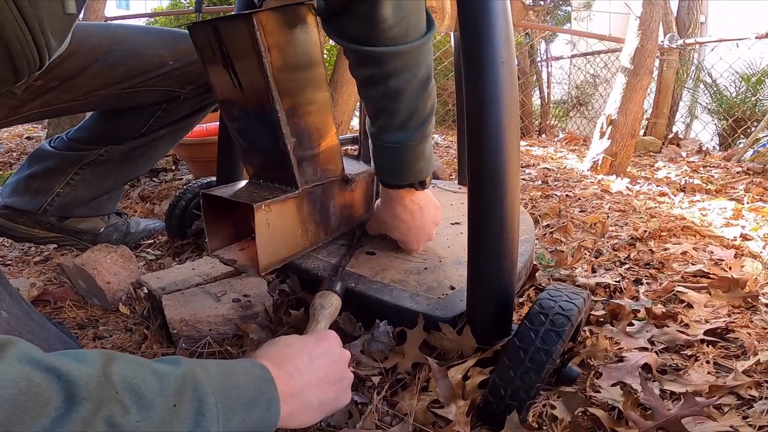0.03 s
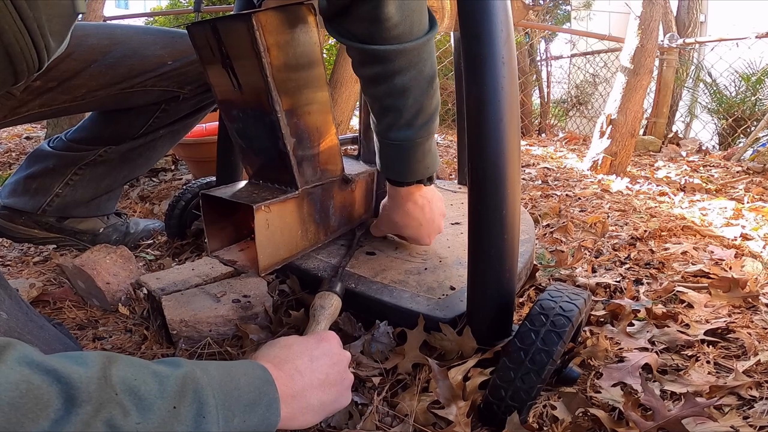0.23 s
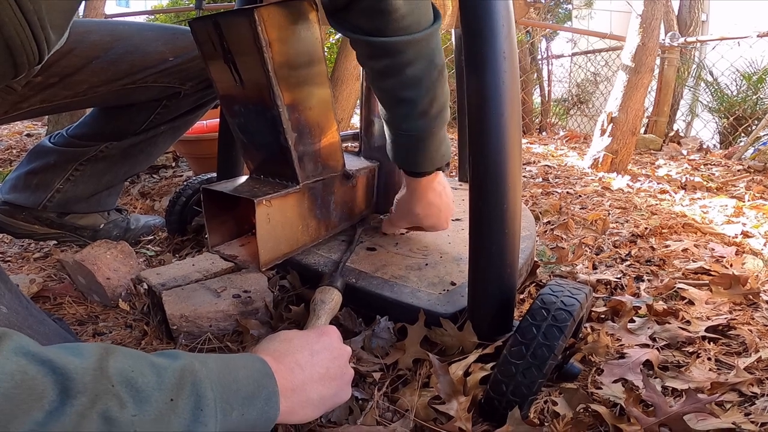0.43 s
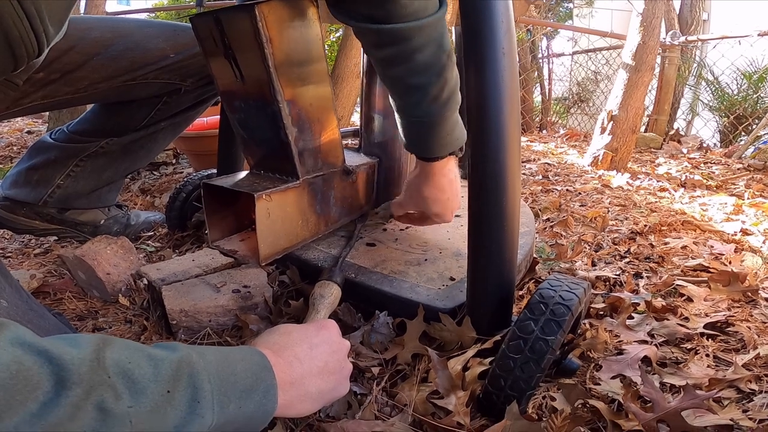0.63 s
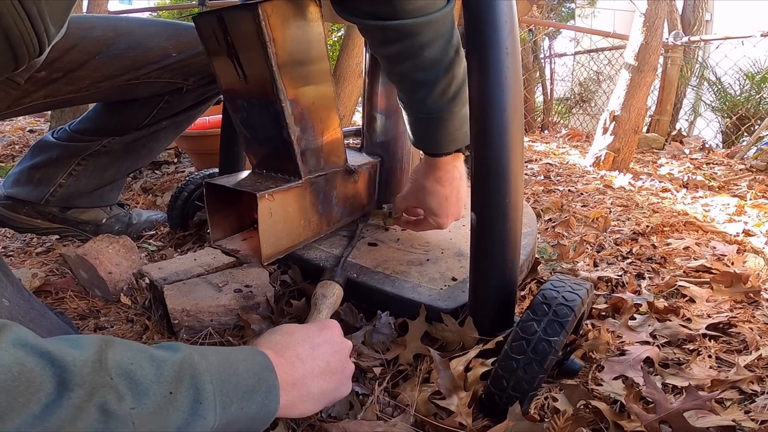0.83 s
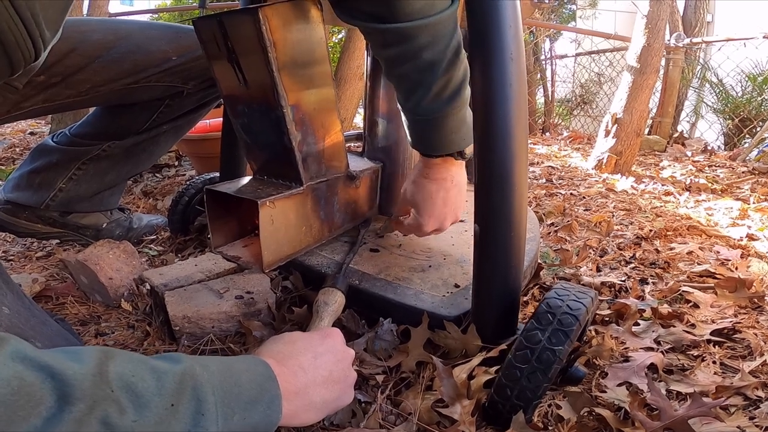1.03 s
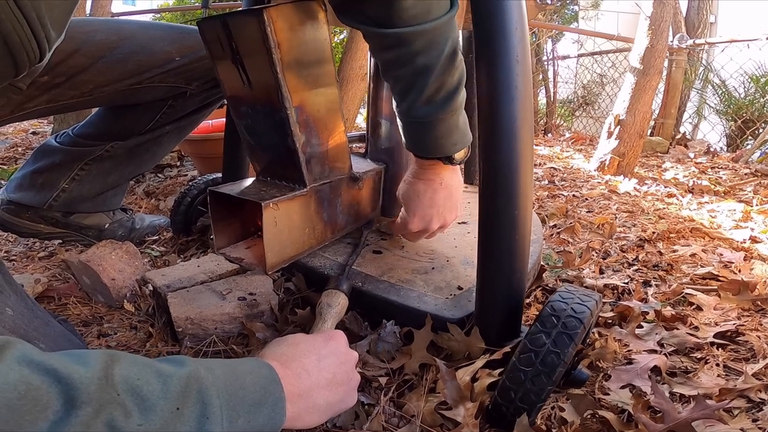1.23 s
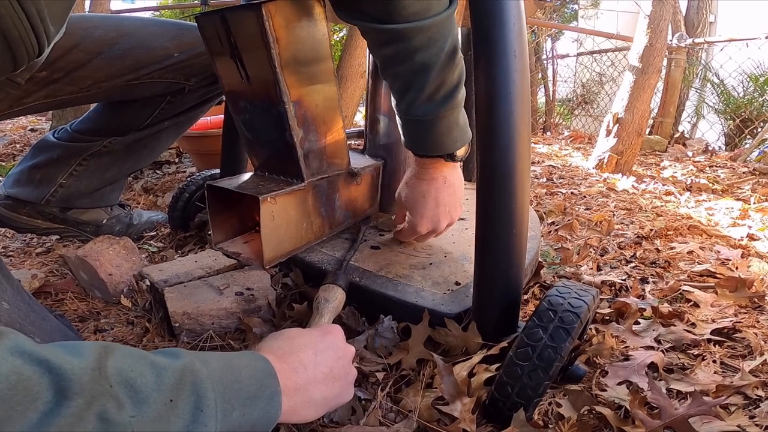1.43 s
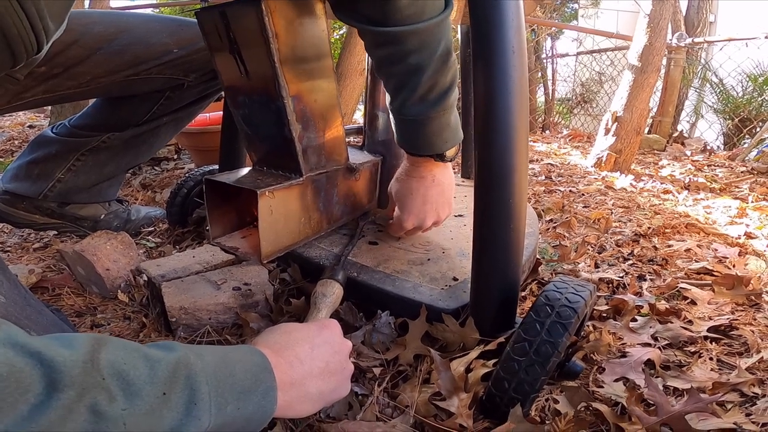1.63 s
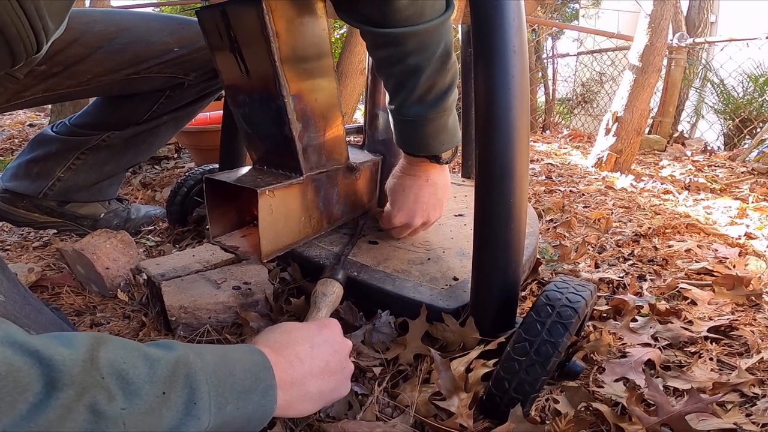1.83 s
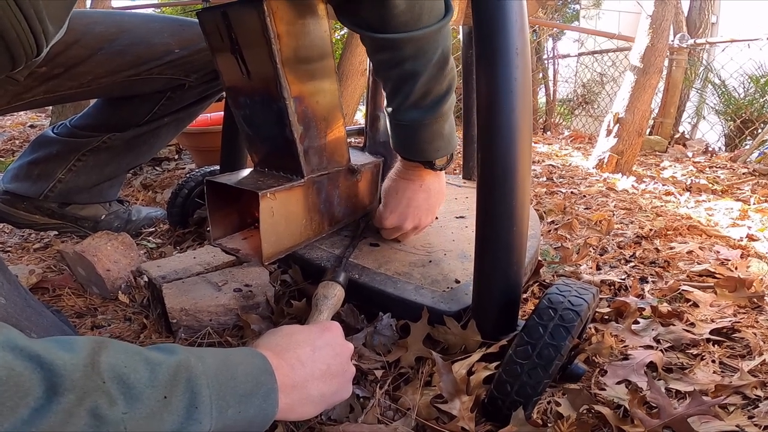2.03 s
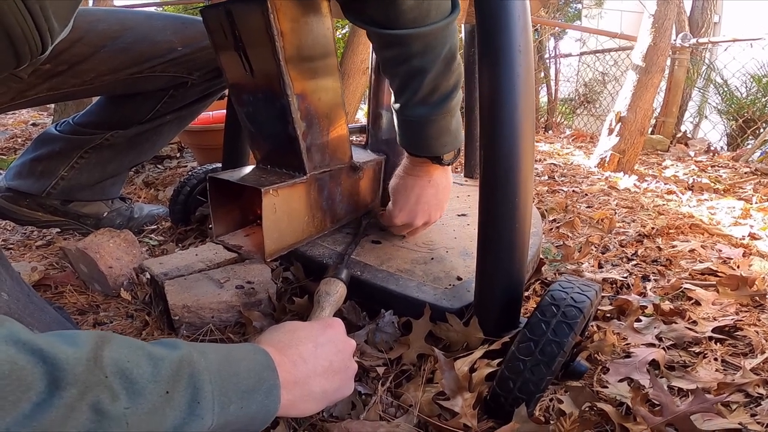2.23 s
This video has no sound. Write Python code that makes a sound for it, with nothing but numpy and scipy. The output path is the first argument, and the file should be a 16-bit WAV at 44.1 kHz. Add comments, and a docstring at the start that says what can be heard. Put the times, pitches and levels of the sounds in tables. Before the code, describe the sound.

Irregular metal taps, scrapes and thuds on a hollow box, with faint dry leaves rustling.

```python
"""A steel tool taps, knocks and scrapes in short strokes under a sheet-metal burner box, outdoors.
Every touch rings the same box: a knock is one hit, a scrape is many tiny slips on rust,
and a heavy bump adds a low thud. Dry leaves snap, and leaves and clothing rustle softly
over the low rumble of distant traffic."""
import sys
import numpy as np
from scipy import signal
from scipy.fft import rfft, irfft, next_fast_len
from scipy.io import wavfile

SR = 44100
rng = np.random.default_rng(int(sys.argv[2]) if len(sys.argv) > 2 else 0)


def unload_wav(signal):
    """Save mono or channel-first audio to the path in sys.argv[1] as 16-bit WAV at rate SR, clipped to [-1, 1]."""
    wavfile.write(
        sys.argv[1],
        SR,
        np.round(np.clip(np.atleast_2d(signal).T, -1, 1) * 32767).astype(np.int16),
    )


N = 105840
T = np.arange(SR // 3) / SR  # the seconds within one short sound
HIT_S = 0.017  # a hit's loudness is set over this opening stretch


# Hits of the tool. A ring_share of 1 lets the box ring freely; less cuts the ring shorter.
# start_s, rise_s, ring_share, bass_db, low_mid_db, high_mid_db, treble_db, top_db
TOOL_HITS = [(0.204, 0.001, 0.8, -44.5, -55, -47.5, -48, -64),
             (.364, 0.00096, 0.84, -37.5, -43.5, -39.5, -45.5, -59),
             (.377, 0.0087, 1, -41.5, -57, -52, -51, -70),
             (.424, 0.0014, 0.97, -47, -46, -52.5, -44, -61.5),
             (0.502, 0.0031, 0.62, -40.5, -53, -45, -62, -95),
             (0.6482, 0.00021, 0.54, -35.5, -37, -32.5, -47, -76),
             (0.835, 0.0008, 1, -36, -32.5, -41, -44.5, -58.5),
             (.983, 0.0013, 0.32, -38, -71, -54, -52, -69),
             (1.144, 0.0041, 0.53, -39, -37.5, -46.5, -44, -65.5),
             (1.224, 0.0012, 1, -43, -39.5, -55, -50.5, -65),
             (1.284, 0.00086, 0.79, -32, -28, -30.5, -51.5, -74),
             (1.335, 0.0014, 0.49, -36, -31.5, -35.5, -40.5, -87),
             (1.3606, 0.00034, 0.78, -31.5, -28.5, -41.5, -34, -51),
             (1.81, 0.00053, 0.77, -41, -50, -39.5, -37, -51.5),
             (2.002, 0.0021, 0.61, -38.5, -47, -55.5, -54, -70),
             (2.216, 0.0035, 0.52, -47.5, -54.5, -51, -76, -73.5)]

def knocks():
    """The tool hits the box and makes it ring; glancing hits take a moment to build up."""
    out = np.zeros((2, N))
    for start_s, rise_s, ring_share, *levels_db in TOOL_HITS:
        ring = box_ring(ring_share, sing_db=-12.5) * (1 - np.exp(-T / rise_s))
        add(out, start_s, set_tone(ring, levels_db, HIT_S))
    return out


# Slides of the tool. sing_db is the strength of the note that sliding brings out most.
# start_s, length_s, swell_db, sing_db, bass_db, low_mid_db, high_mid_db, treble_db, top_db
TOOL_SLIDES = [(0.123, 0.027, 1, -16, -46.5, -67.5, -57.5, -89, -70.5),
               (0.432, 0.046, 11, 5, -44, -50, -54.5, -51.5, -67),
               (0.514, 0.084, -8, -13, -55, -62, -62.5, -73, -111),
               (0.655, 0.018, -5, -32, -51, -40.5, -38, -47, -95),
               (0.738, 0.091, 5.5, 3.5, -42.5, -40, -49.5, -51.5, -73),
               (0.841, 0.071, -1, -6, -31.5, -37.5, -41.5, -42, -60.5),
               (0.982, 0.039, 0, -2, -40.5, -49, -45.5, -47.5, -65.5),
               (1.122, 0.052, 6, -1, -40, -42.5, -41.5, -50, -71.5),
               (1.206, 0.078, 9.5, 11, -36, -45.5, -43.5, -56, -68),
               (1.297, 0.062, 11.5, -3, -30.5, -52, -34, -49, -67),
               (1.381, 0.049, -16, -6, -39, -37, -45.5, -62.5, -73),
               (1.536, 0.032, -3, 8, -51.5, -60, -65.5, -60.5, -73.5),
               (1.723, 0.059, 2.5, 3, -47.5, -51, -48.5, -52, -70.5),
               (1.861, 0.071, -14, -1, -50, -57.5, -49, -59, -83),
               (2.001, 0.036, -9, -20, -53.5, -47.5, -51.5, -61.5, -72.5),
               (2.064, 0.086, -9, -9, -49.5, -53, -60, -62, -75),
               (2.315, 0.03, 5, -23, -43.5, -63.5, -59, -63, -74.5)]

def scrapes():
    """The sliding tool catches and slips on rust; each tiny slip rings the box."""
    out = np.zeros((2, N))
    for start_s, length_s, swell_db, sing_db, *levels_db in TOOL_SLIDES:
        stroke = (T < length_s) * amp(swell_db * np.minimum(T / length_s, 1))
        slips = tiny_clicks(len(T), per_second=900, spread_db=2) * stroke
        ring = box_ring(ring_share=0.8, sing_db=sing_db)  # the pressing tool shortens the ring
        scrape = signal.fftconvolve(slips[None], ring, axes=1)[:, :len(T)]
        add(out, start_s, set_tone(scrape, levels_db, length_s + HIT_S))
    return out


# Heavy bumps: start_s, rise_s, thud_pitch_hz, thud_db, clunk_db
HEAVY_BUMPS = [(.295, 0.0016, 215, -23, -34), (1.3615, 0.001, 217, -15.5, -21),
               (1.738, 0.0031, 222, -22, -54), (2.003, 0.0028, 232, -25, -55)]
# Notes of the hollow inside the box: pitch_hz, strength_db, fade_s
HOLLOW_NOTES = [(350, 1, 0.062), (468.5, -1, 0.16), (551, -0.5, 0.052)]

def bumps():
    """A heavy bump jolts the whole box: a low thud and a hollow clunk."""
    out = np.zeros((2, N))
    clunk = sum(fading_note(*note) for note in HOLLOW_NOTES)
    for start_s, rise_s, pitch_hz, thud_db, clunk_db in HEAVY_BUMPS:
        jolt = fading_note(pitch_hz, thud_db, fade_s=0.099) + amp(clunk_db) * clunk
        add(out, start_s, place(jolt * (1 - np.exp(-T / rise_s))))
    return out


# The box's clear notes; the two shortest are its hollow thump: pitch_hz, strength_db, fade_s
BOX_NOTES = [(220.4, 0.5, 0.15), (231, 8, 0.036), (265.4, -4, 0.38), (469, 1, 0.26), (503.6, 5.5, 0.057),
             (563.3, -15, 0.28), (685.5, -10, 0.48), (793.3, 5.5, 0.13), (929, -7, 0.45),
             (1035, -6.5, 0.27), (1273, -9.5, 0.23), (1508, -9, 0.4), (1749, -10.5, 0.2),
             (1924, -7.5, 0.26), (2320, -15, 0.41), (2816, -8.5, 0.21), (5000, -8.5, 0.1)]

def box_ring(ring_share, sing_db):
    """One hit on a new spot of the box: a metal clang and clear notes, equally loud."""
    clang = sheet_clang(ring_share)
    singing_note = (1532, sing_db, 0.28)  # the wall's note that sliding brings out most
    notes = np.zeros(len(T))
    for pitch_hz, strength_db, fade_s in BOX_NOTES + [singing_note]:
        sign, scatter_db = rng.choice([-1, 1]), rng.normal(0, 2)
        notes += sign * fading_note(pitch_hz, strength_db + scatter_db, fade_s * ring_share)
    return place(clang + unit(notes))


# Tone of the clang: pitch_hz, strength_db
CLANG_TONE = [(60, -17), (140, -24.5), (220, 6), (350, -2), (500, -2), (1400, -1.5), (1640, -15),
              (1950, -7.5), (3800, -14.5), (5200, -16), (7000, -23), (12500, -32), (15500, -51)]
# How long the clang rings freely: pitch_hz, fade_s
CLANG_FADE = [(200, 0.48), (1000, 0.37), (2500, 0.26), (5000, 0.2), (11000, 0.12)]
# How much the clang varies from spot to spot: pitch_hz, spread_db
CLANG_SPREAD = [(200, 2.5), (1500, 3.5), (5000, 4.5)]

def sheet_clang(ring_share):
    """Sheet metal rings with so many notes that they blur into noise; high ones die first."""
    pitches_hz = np.arange(0, SR / 2, 110.7)
    spot_db = along(CLANG_SPREAD, pitches_hz) * rng.standard_normal(4096).clip(-2, 2)[:len(pitches_hz)]
    noise = filtered(rng.standard_normal((2, len(T))), lambda hz: amp(np.interp(hz, pitches_hz, spot_db)))
    hz, time_s, bands = signal.stft(noise, SR, nperseg=256)  # split by pitch to fade each band
    fade_s = ring_share * along(CLANG_FADE, hz)[:, None]
    clang = signal.istft(bands * amp(-60 * time_s / fade_s), SR, nperseg=256)[1][:, :len(T)]
    first_crack = 1 + amp(-21) * np.exp(-T / 0.0058)
    return unit(coloured(stereo(clang, LIKENESS) * first_crack, CLANG_TONE))


# Borders of the five bands, from bass to top: pitch_hz
BAND_BORDERS = [150, 400, 1000, 2500, 7000, 15000]
# Middles of those bands: pitch_hz
BAND_MIDDLES = [240, 640, 1500, 4200, 9000]

def set_tone(sound, levels_db, span_s):
    """Set five band levels over the first span_s: hard hits are bright, padded ones dull."""
    opening = sound.mean(0)[:int(span_s * SR)]
    power = abs(rfft(opening, SR)) ** 2 * 2 / (span_s * SR * SR)
    band_power = np.array([power[low:high].sum() for low, high in zip(BAND_BORDERS, BAND_BORDERS[1:])])
    boost_db = levels_db - 10 * np.log10(band_power + 1e-20)
    return coloured(sound, list(zip(BAND_MIDDLES, boost_db)))


# Single leaves breaking: start_s, level_db
LEAF_SNAPS = [(0.152, -65), (0.2598, -53), (1.455, -54.5), (1.723, -63), (1.776, -62), (1.853, -37.5),
              (1.8927, -43.5), (2.069, -61), (2.129, -53), (2.2955, -59.5), (2.3226, -57)]
# Tone of a snap: pitch_hz, strength_db
SNAP_TONE = [(400, 1), (1500, -5), (5000, 3.5), (7000, -7.5), (12500, -16.5), (15500, -36)]

def snaps():
    """A dry leaf breaks with a crisp tick and a short crumbling tail."""
    out = np.zeros((2, N))
    tick = 1 + amp(-4.5) * np.exp(-T / 0.0011)
    tail = amp(-60 * T / 0.13)
    for start_s, level_db in LEAF_SNAPS:
        noise = stereo(rng.standard_normal((2, len(T))), LIKENESS)
        crunch = unit(place(coloured(noise, SNAP_TONE)))
        add(out, start_s, amp(level_db) * tick * tail * crunch)
    return out


# How the rustle rises and falls: time_s, level_db
RUSTLE_LEVELS = [(0, -50), (.3, -48), (.7, -44), (1.3, -56), (1.52, -81), (1.68, -78), (1.8, -51),
                 (2.15, -58), (2.26, -57), (2.4, -56)]
# Tone of the rustle: pitch_hz, strength_db
RUSTLE_TONE = [(200, 31), (1000, -8.5), (3000, 4.5), (5000, 3.5), (7000, -6), (12500, -18.5), (15500, -65)]

def rustle():
    """Dry leaves and cloth crackle faintly as the person shifts."""
    crackle = np.array([tiny_clicks(N, per_second=1400, spread_db=27) for _ in range(2)])
    hiss = 1.23 * rng.standard_normal((2, N))
    leaves = coloured(stereo(unit(crackle) + hiss, LIKENESS), RUSTLE_TONE)
    level_db = np.interp(np.arange(N) / SR, *np.transpose(RUSTLE_LEVELS))
    return unit(place(leaves)) * amp(level_db)


# Tone of the outdoor rumble and hiss: pitch_hz, strength_db
RUMBLE_TONE = [(15, -7), (30, -4.5), (55, 5.5), (100, 0), (150, -7), (250, -16), (400, -25.5), (700, -36.5),
               (2000, -38.5), (5000, -57.5), (8000, -54), (13000, -68), (15500, -83)]
# How alike the rumble is on the left and right: pitch_hz, likeness (1 is the same)
RUMBLE_LIKENESS = [(25, 0.72), (80, 1), (500, 0.87), (3000, 0.13), (10000, 0.36)]
# Far-off engines: pitch_hz, loudest_at_s, half_length_s, level_db
ENGINE_HUMS = [(75.15, 2.09, 0.15, -39.5), (101.05, 0.41, 0.23, -42.5)]

def distant_traffic():
    """Far-off traffic makes a low rumble with faint hiss; engine hums swell and fade."""
    time_s = np.arange(N) / SR
    noise = coloured(rng.standard_normal((2, N)), RUMBLE_TONE)
    out = amp(-39) * unit(stereo(noise, RUMBLE_LIKENESS))
    for pitch_hz, loudest_at_s, half_length_s, level_db in ENGINE_HUMS:
        wander = np.cumsum(rng.standard_normal(N)) / np.sqrt(SR)
        hum = np.sqrt(2) * np.sin(2 * np.pi * pitch_hz * time_s + 3 * wander)
        swell = np.exp(-((time_s - loudest_at_s) / half_length_s) ** 2 / 2)
        out += amp(level_db) * swell * hum
    return out * amp([[0.75], [-0.75]])  # a little louder on the left


# How alike nearby sounds are on the left and right: pitch_hz, likeness (1 is the same)
LIKENESS = [(100, 1), (1000, 0.84), (5000, 0.82), (12000, 0.077)]

def stereo(pair, likeness):
    """Blend two unrelated sounds into a left and right that are partly alike."""
    angle = lambda hz: np.arccos(np.clip(along(likeness, hz), -1, 1)) / 2
    middle, side = filtered(pair, lambda hz: np.array([np.cos(angle(hz)), np.sin(angle(hz))]))
    return np.array([middle + side, middle - side])


# Balance of nearby sounds: pitch_hz, left_minus_right_db
BALANCE = [(200, 1.5), (700, -1.5), (3000, 1.8), (5500, 1.1), (12000, -2)]

def place(sound, left_delay_s=4.2e-5):
    """The work is a little to the right, so its sound reaches the left side later."""
    sides = np.array([[.5], [-.5]])
    delay = lambda hz: np.exp(-2j * np.pi * hz * sides * left_delay_s)
    return filtered(sound, lambda hz: amp(sides * along(BALANCE, hz)) * delay(hz))


def fading_note(pitch_hz, level_db, fade_s):
    """A pure note that drops by 60 dB in fade_s."""
    return amp(level_db - 60 * T / fade_s) * np.sin(2 * np.pi * pitch_hz * T)


def tiny_clicks(n, per_second, spread_db):
    """Clicks of uneven size at random moments."""
    clicks = (rng.random(n) < per_second / SR) * rng.choice([-1, 1], n)
    return clicks * amp(spread_db * rng.standard_normal(n).clip(-2, 2))


def amp(db):
    """Turn decibels into a multiplier."""
    return 10 ** (np.asarray(db) / 20)


def unit(sound):
    """Scale a sound to an average power of 1."""
    return sound / np.sqrt(np.mean(sound ** 2) + 1e-20)


def along(points, hz):
    """Read between the rows of a (pitch_hz, value) table."""
    pitches_hz, values = np.transpose(points)
    return np.interp(np.log(hz + 1), np.log(pitches_hz + 1), values)


def filtered(sound, response):
    """Multiply each pitch in a sound by response(hz)."""
    n = sound.shape[-1]
    padded = 2 * next_fast_len(n // 2 + SR // 20)
    return irfft(rfft(sound, padded) * response(np.fft.rfftfreq(padded, 1 / SR)), padded)[..., :n]


def coloured(sound, tone):
    """Shape a sound with a (pitch_hz, strength_db) table."""
    def response(hz):
        log_echo = irfft(np.log(amp(along(tone, hz))))
        half = len(log_echo) // 2
        log_echo[1:half] *= 2
        log_echo[half + 1:] = 0  # nothing may ring before its hit
        return np.exp(rfft(log_echo))
    return filtered(sound, response)


def add(out, start_s, sound):
    """Mix a sound in at start_s."""
    part = out[:, round(start_s * SR):][:, :sound.shape[1]]
    part += sound[:, :part.shape[1]]


def scene():
    """The tool on the box, with leaves and traffic behind it."""
    return knocks() + scrapes() + bumps() + rustle() + snaps() + distant_traffic()


def record(dry):
    """Cut off the very highest treble."""
    return filtered(dry, lambda hz: hz < 15700)


dry = scene()
out = record(dry)
unload_wav(out)
```